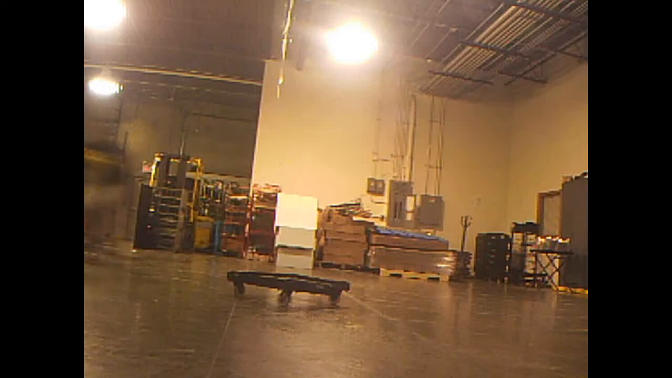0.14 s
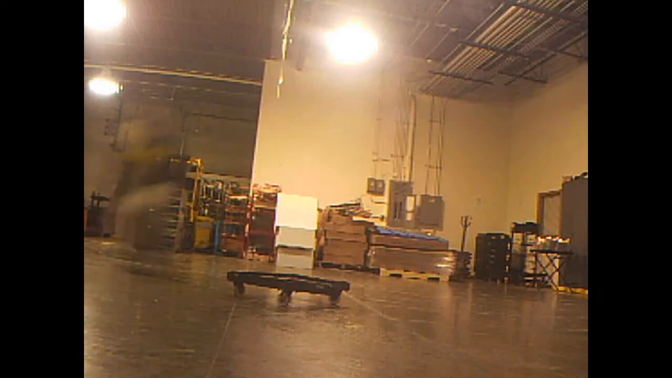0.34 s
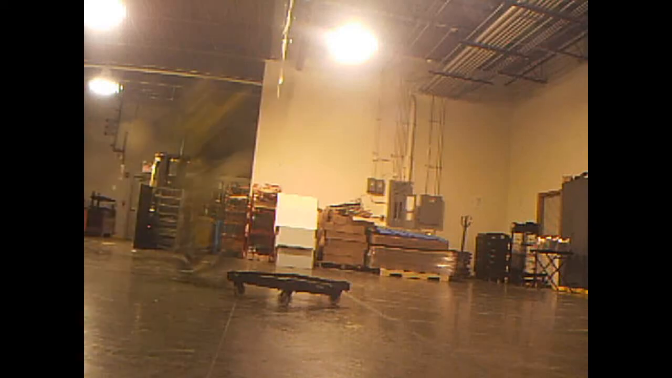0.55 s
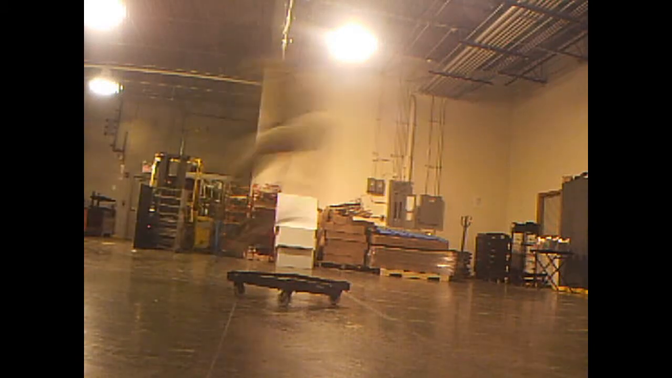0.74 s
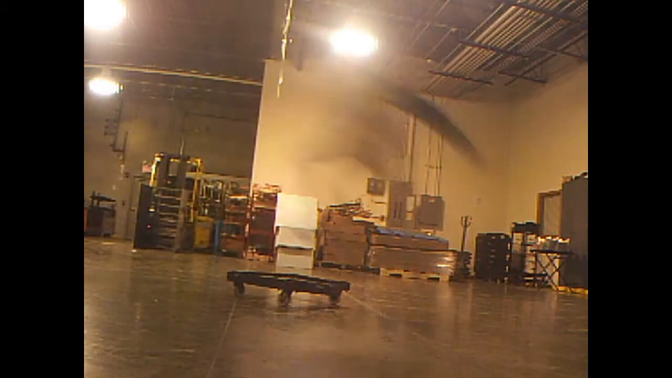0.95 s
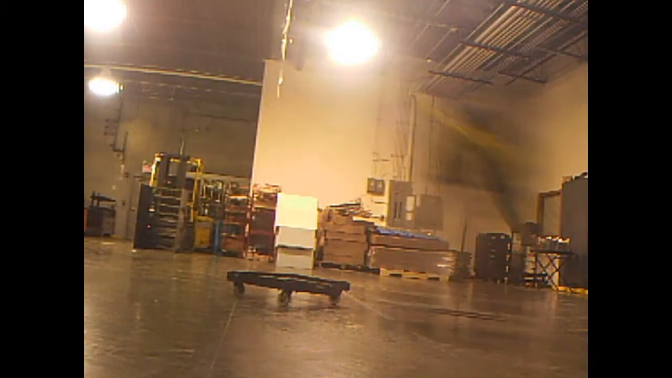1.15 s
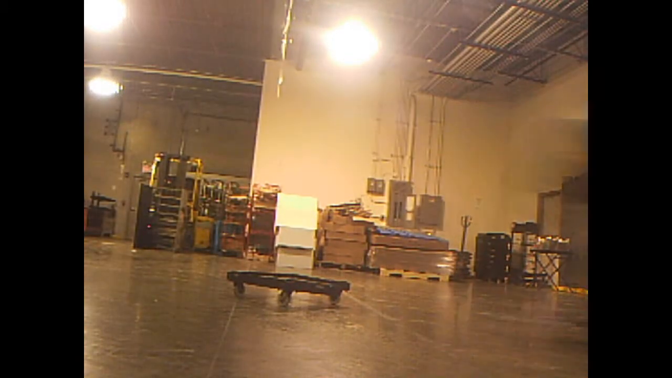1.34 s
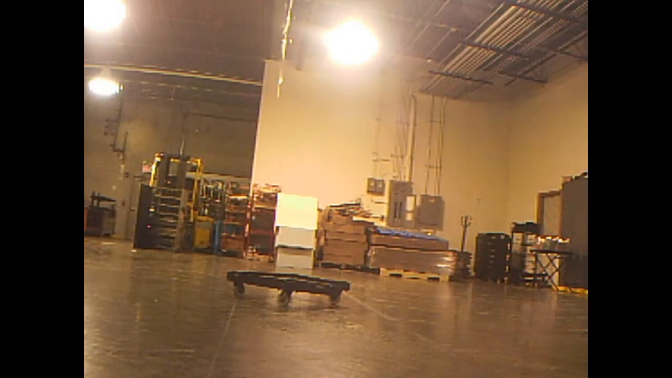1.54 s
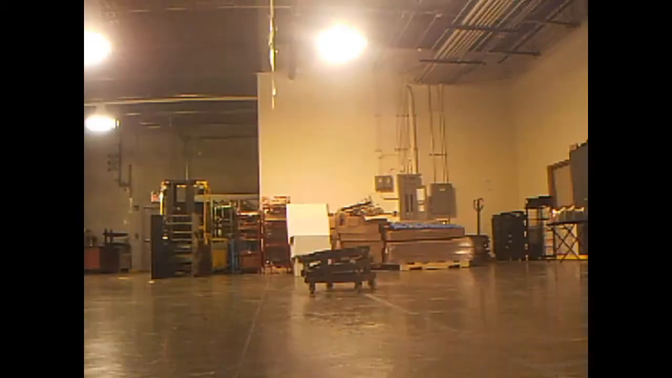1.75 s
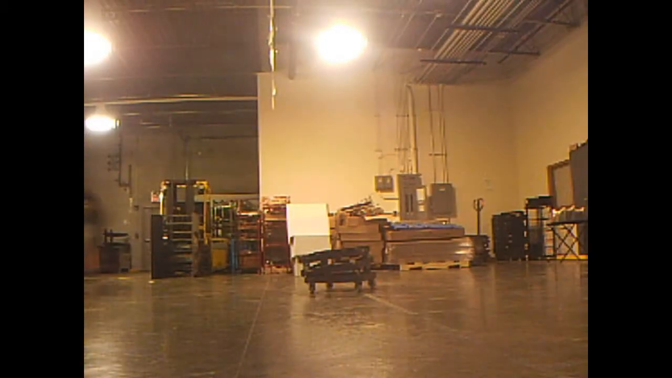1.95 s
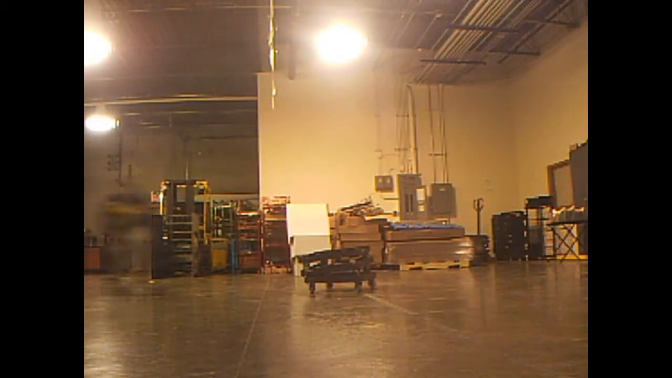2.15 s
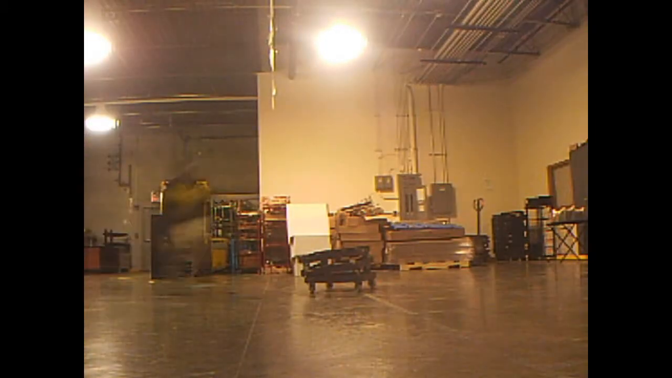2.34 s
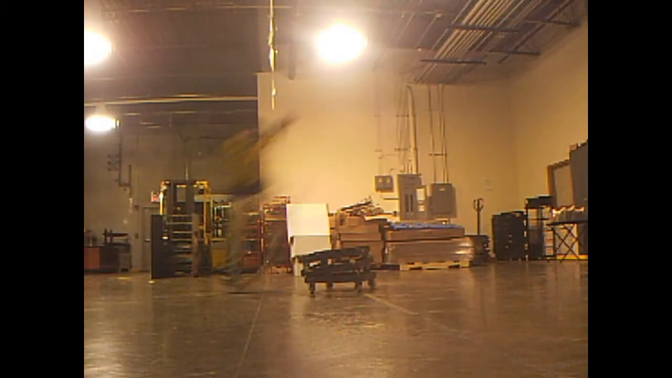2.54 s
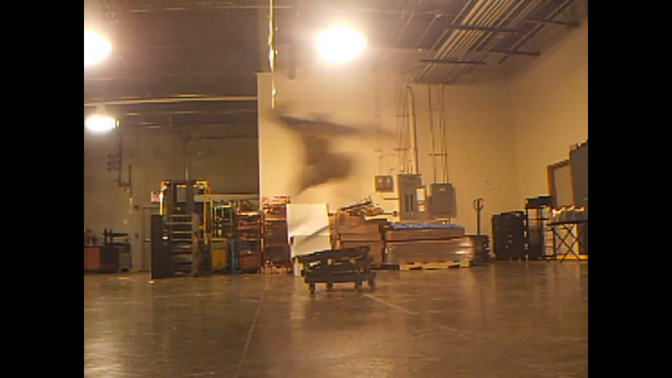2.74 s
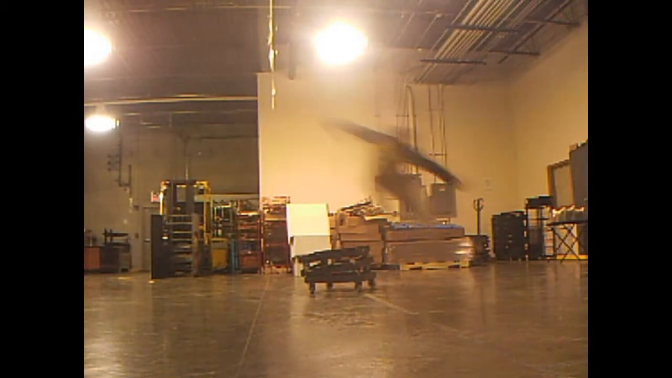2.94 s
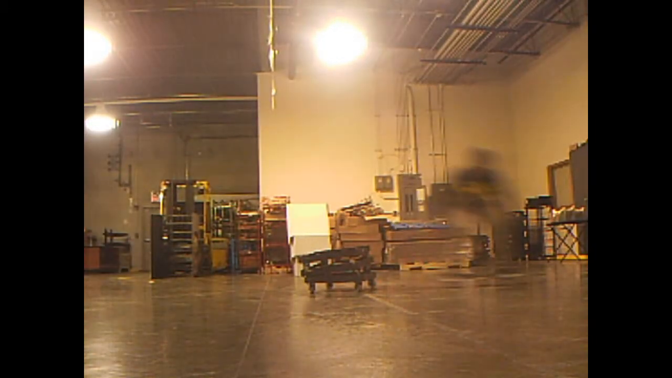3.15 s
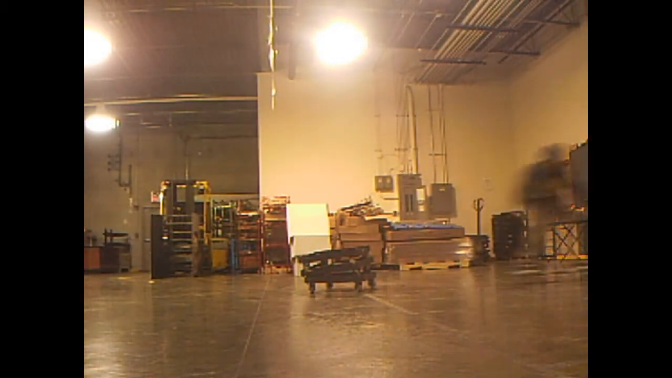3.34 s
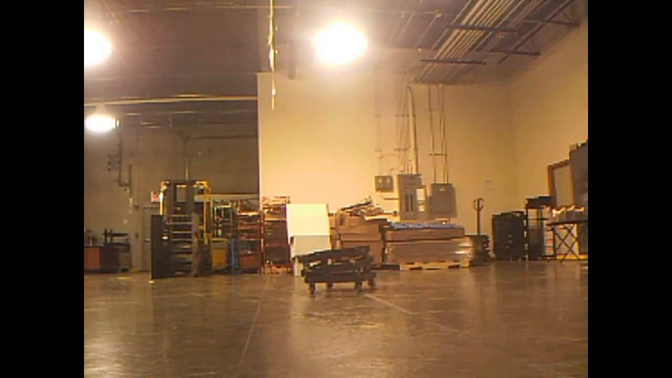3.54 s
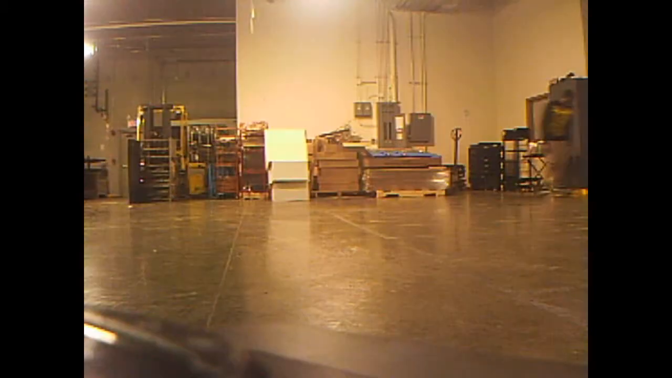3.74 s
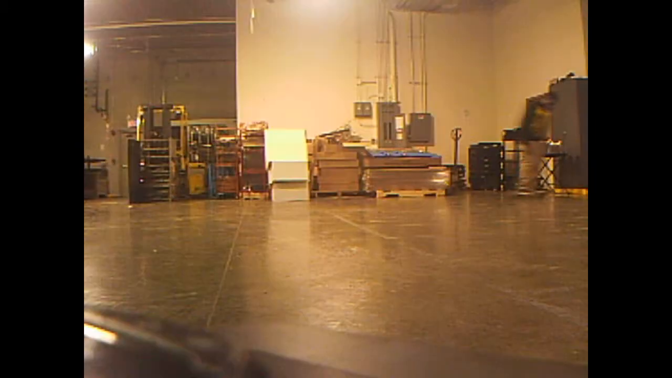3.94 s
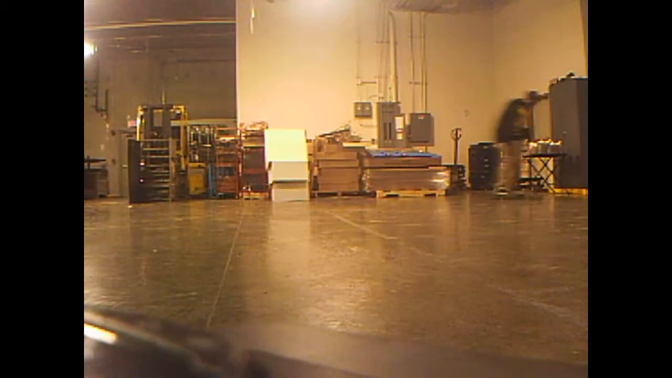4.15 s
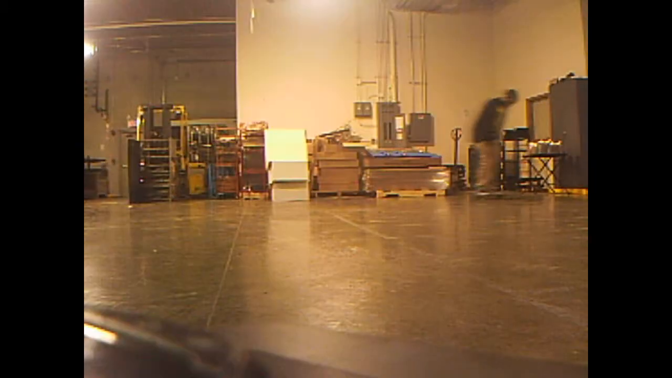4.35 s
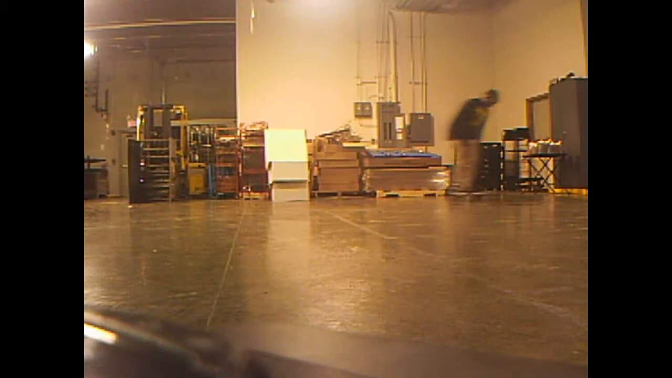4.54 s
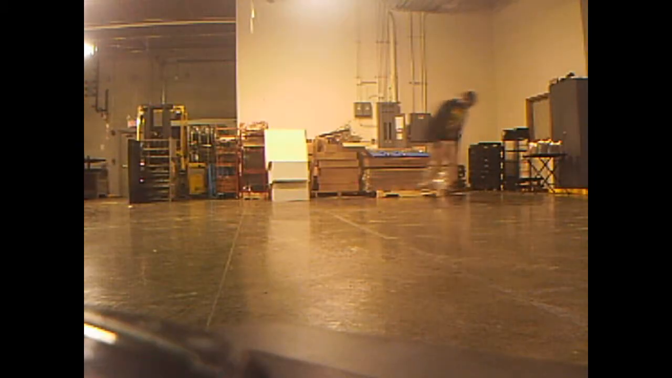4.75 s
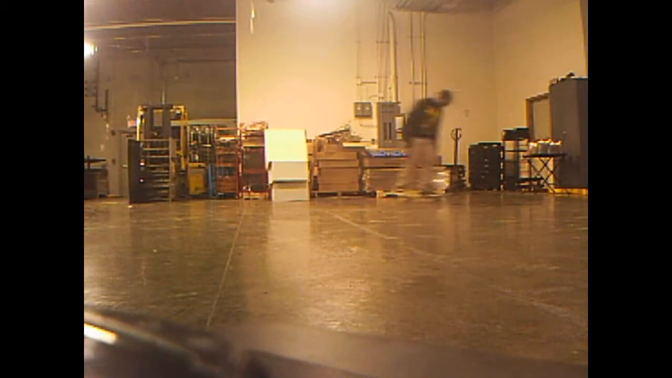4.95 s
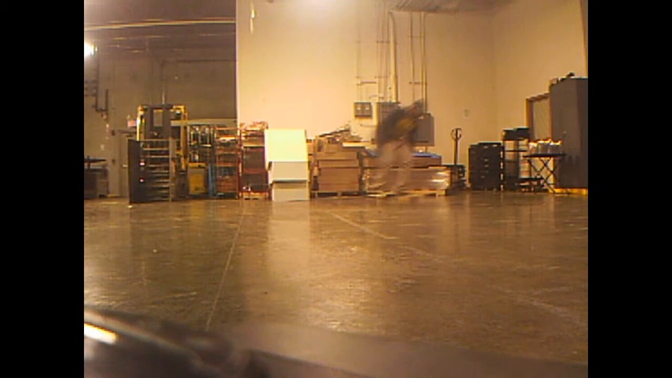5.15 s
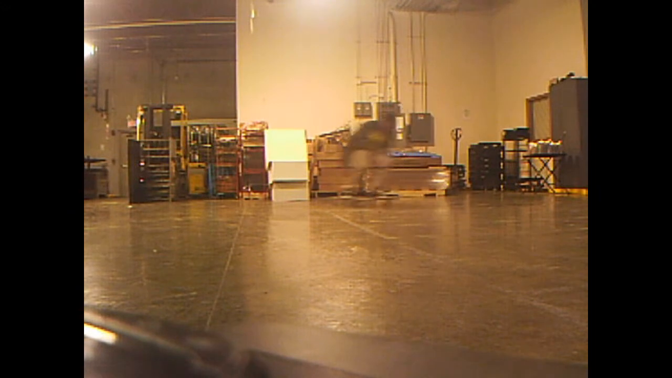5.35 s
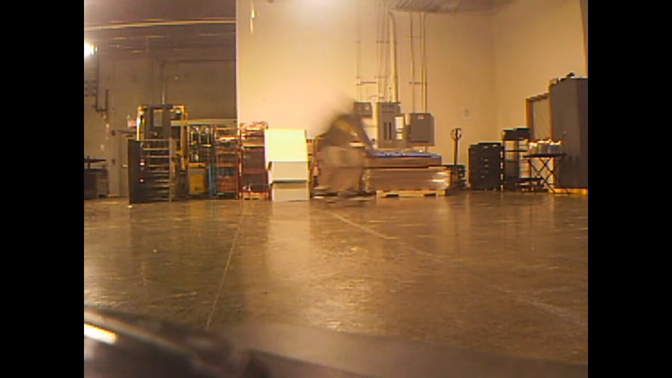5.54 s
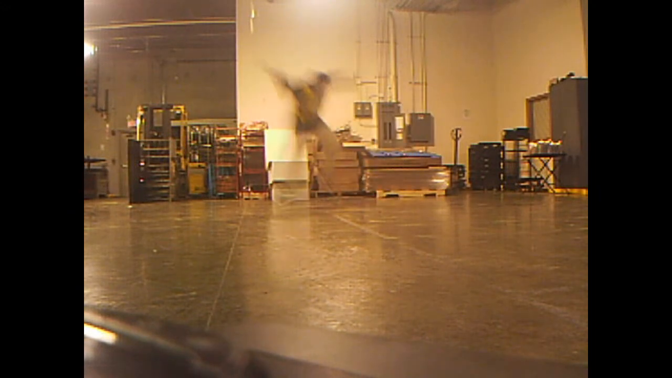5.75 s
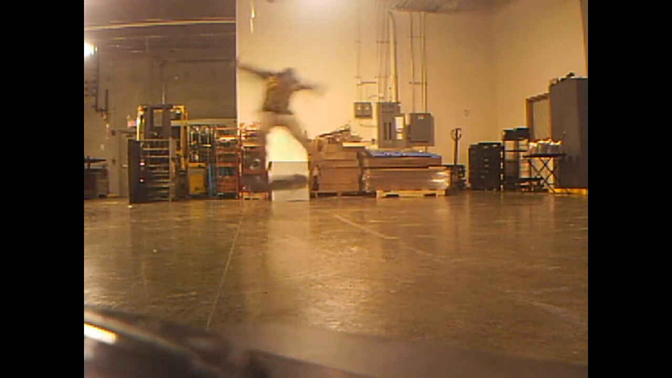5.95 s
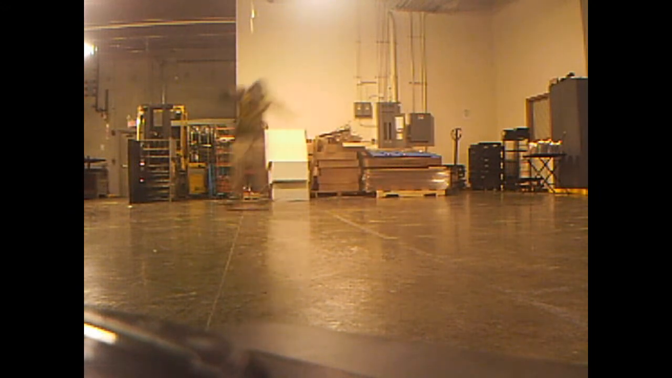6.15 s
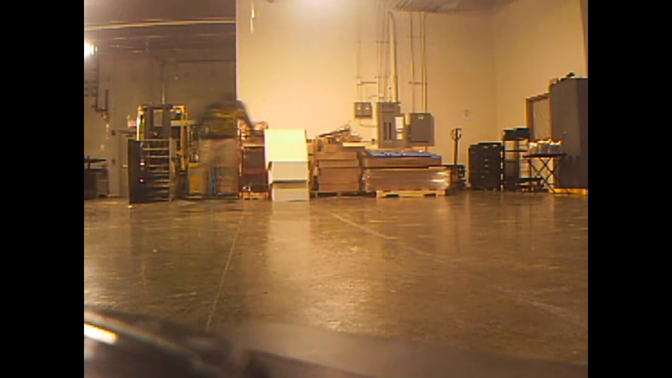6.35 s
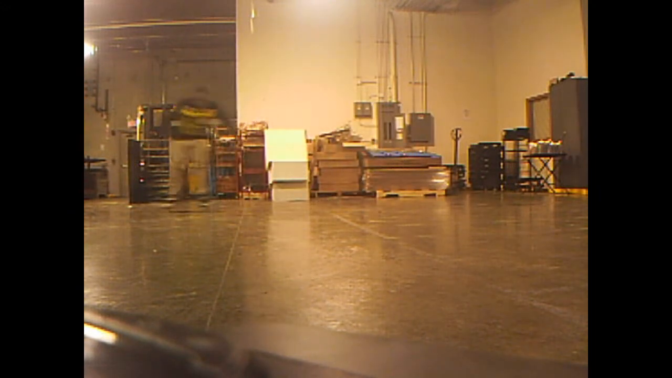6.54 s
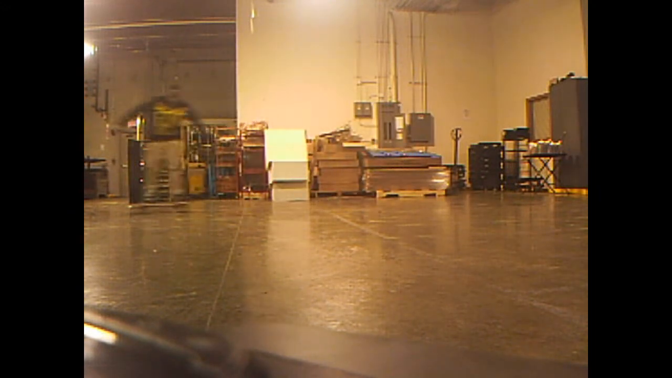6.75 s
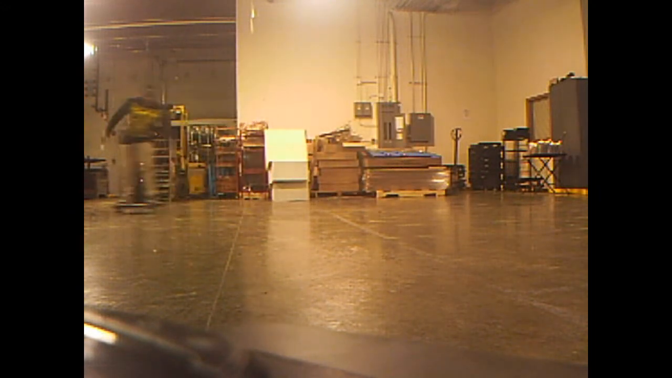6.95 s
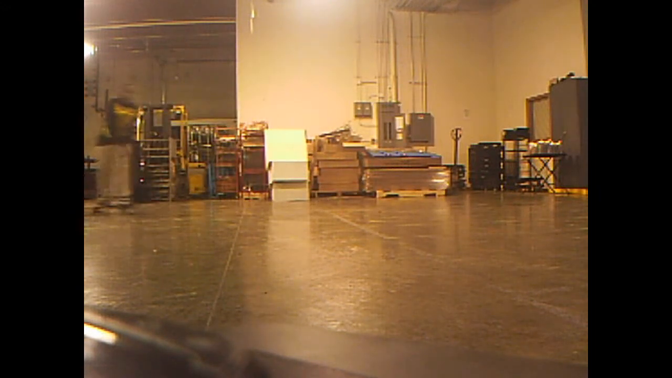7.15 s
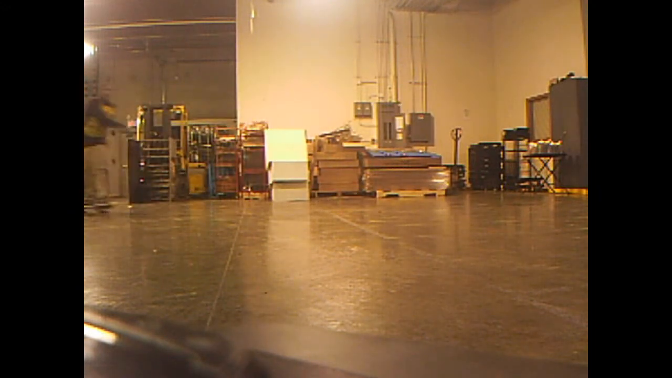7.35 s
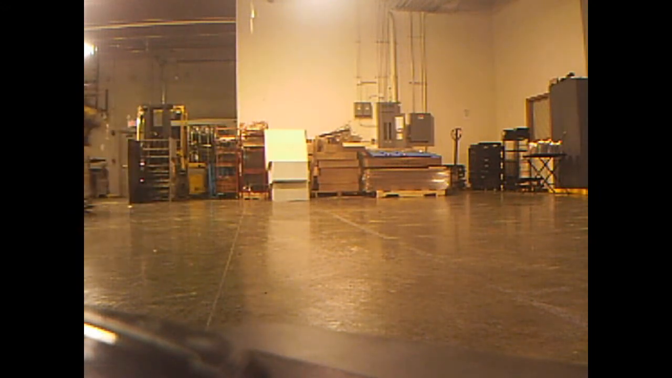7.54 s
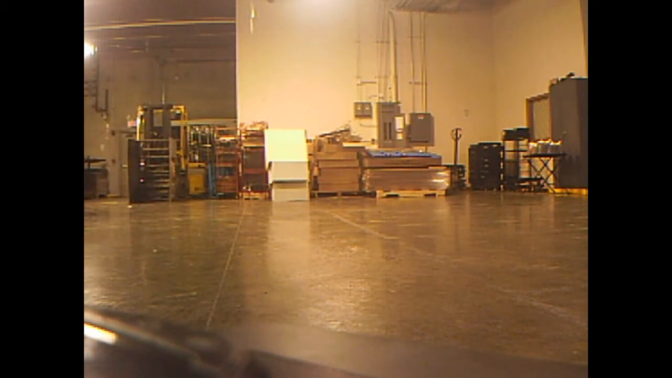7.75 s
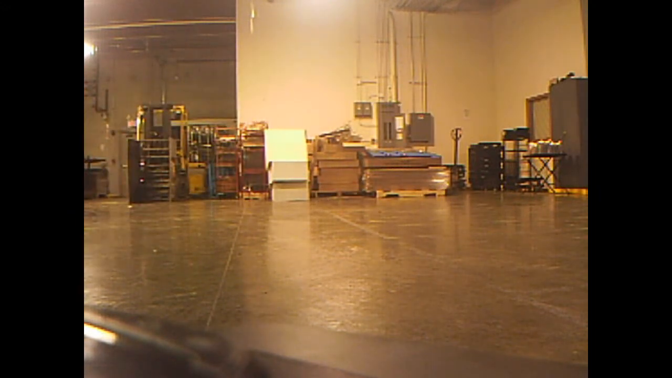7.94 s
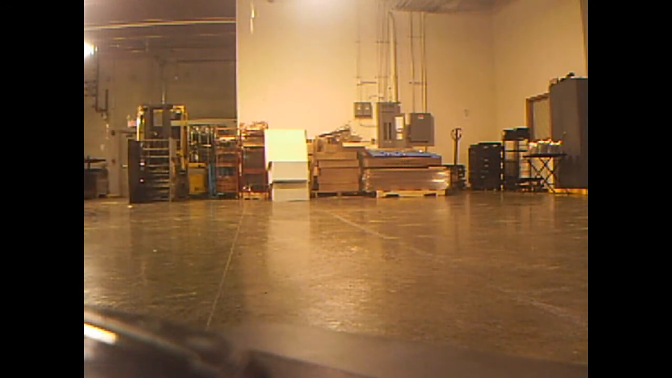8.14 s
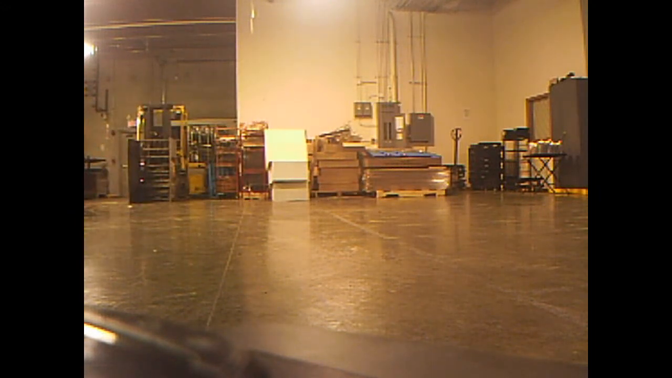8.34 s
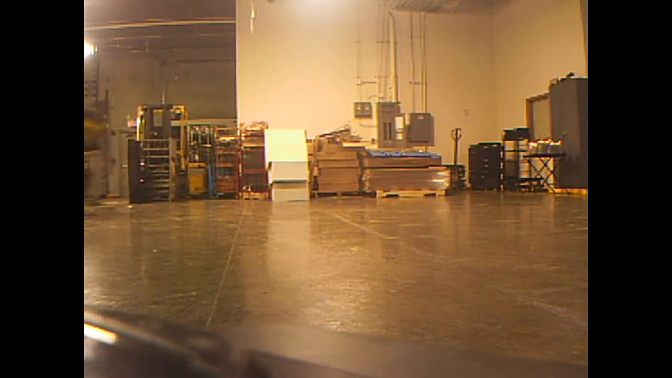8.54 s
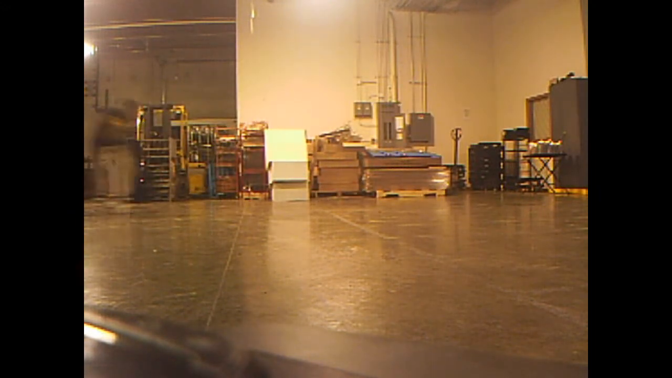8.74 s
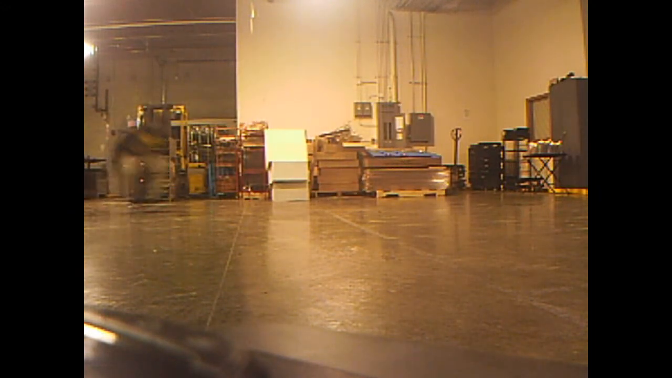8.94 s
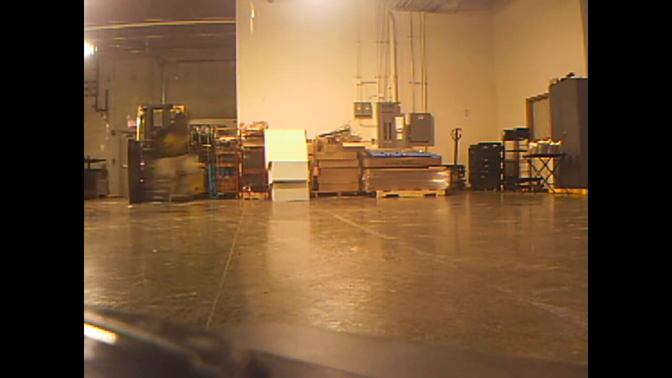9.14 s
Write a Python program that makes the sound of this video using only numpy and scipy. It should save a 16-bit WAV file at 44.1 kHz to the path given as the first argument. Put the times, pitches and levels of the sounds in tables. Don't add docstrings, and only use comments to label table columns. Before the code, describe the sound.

Over a steady ventilation wash and electrical buzz, a skateboard rolls in, pops and lands hard; an abrupt cut, then another pop and slam; another cut, a longer distant roll with soft shoe scuffs, a third pop and landing, and rolling away. The final view is quiet, distant wheels. The hall is very reverberant; a small camera microphone crackles on the impacts and ducks afterward.

```python
import sys
import numpy as np
from scipy import signal
from scipy.fft import rfft
from scipy.io import wavfile
from scipy.ndimage import uniform_filter1d

SR = 44100
rng = np.random.default_rng(int(sys.argv[2]) if len(sys.argv) > 2 else 0)


def natural_amplitude(level_db):
    exponent = np.asarray(level_db, float) / 20
    return 10 ** exponent


def dump_mix(stems):
    frames = np.atleast_2d(stems).T
    limited = np.clip(frames, -1, 1)
    pcm = np.round(limited * 32767).astype(np.int16)
    wavfile.write(sys.argv[1], SR, pcm)


N = 405279

VIEW_STARTS = [.0635, 1.856, 3.817, 7.95]
# freq_hz, level_db (per Hz)
LIGHT_COLOUR = [(59, -61.5), (100, -29.5), (391, -6), (461, -1), (1200, -12), (1330, -5.5), (3990, -16.5),
                (13000, -44)]
# freq_hz, level_db (per Hz)
HEAVY_COLOUR = [(35, -68.5), (60, -44.5), (207, -16.5), (259, -22), (310, -12.5), (416, -10.5), (544, -2.5),
                (609, -6.5), (798, -2), (1570, -14), (3600, -24), (13000, -60.5)]
# pitch_hz, level_db, t60_s (time to fade by 60 dB)
DECK_TONES = [(71, -8.5, 0.1), (165, -5.5, 0.068), (560, 1.5, .2), (707, -1, 0.22), (892, -4, .16),
              (1111, -5.5, 0.15), (1400, -14, 0.026), (1847, -9.5, 0.11)]
# pitch_hz, width_hz, level_db (not used)
FREE_DECK_TONES = [(483, 22, 0), (688, 74, 0), (1263, 130, -2), (1645, 67, -1), (1903, 58, -1),
                   (2280, 73, -3), (2770, 91, -7), (3780, 67, -12)]
# freq_hz, t60_s
HALL_FADE = [(100, 0.53), (250, 2.07), (600, 2.06), (1200, 2.82), (2500, 2.45), (5000, 1.55), (10000, 0.88)]
# freq_hz, level_db (per Hz)
WHEEL_COLOUR = [(59, -50), (100, -18), (125, -13), (200, -31.5), (408, -6.5), (565, 1), (959, -13.5),
                (1110, -8), (1280, -18), (1700, -14.5), (2880, -29), (8650, -43.5), (13000, -51)]
# freq_hz, level_db (per Hz)
AIR_COLOUR = [(12, -31.5), (20, -10), (32, -22), (119, -14), (179, -16), (551, -10), (615, -3), (725, -5),
              (855, -6.5), (928, -10), (1120, -12.5), (1950, -21.5), (3460, -31.5), (8790, -51),
              (14000, -61)]
# freq_hz, level_db (rms)
BUZZ_COLOUR = [(120, -55.5), (240, -75.5), (360, -58.5), (1000, -56.5), (2200, -72.5), (5000, -90.5),
               (9000, -97.5)]
# start_s, peak_db, pitch_hz, t60_s
POPS = [(.642, 2, 2020, 0.046), (.659, -3, 2970, 0.016), (.665, -3.5, 2390, 0.037),
        (.690, -2.5, 4100, 0.018), (2.552, -2, 1928, 0.085), (2.566, -4, 2815, 0.059),
        (2.573, -5, 2617, 0.074), (2.615, -12, 1730, .05), (2.832, -21, 6000, 0.0098),
        (5.791, -11.5, 4460, 0.16), (5.808, -4.5, 7050, 0.12), (5.832, -11, 1624, 0.11),
        (5.849, -7, 2190, 0.09), (6.057, -24.5, 6840, .01)]
# start_s, peak_db, pitch_hz, t60_s
LANDINGS = [(1.0165, -2.5, 1400, 0.073), (1.022, 9.5, 720, .065), (1.045, 8, 550, 0.074),
            (1.062, 6.5, 905, 0.21), (1.08, 2.5, 720, 0.068), (1.098, 7.5, 550, 0.085),
            (1.116, 0, 560, 0.28), (2.969, 9.5, 942, 0.097), (2.986, 9, 778, 0.13), (3.015, 9.5, 778, 0.16),
            (3.036, 7, 530, .08), (3.06, 4.5, 940, .07), (3.085, 6.5, 778, 0.027), (6.116, -1, 613, 0.037),
            (6.134, -7, 592, 0.1), (6.141, 2.5, 570, .12), (6.153, 6, 800, 0.12), (6.172, 4, 1067, 0.14),
            (6.19, 2.5, 899.6, 0.089), (6.250, 6.5, 800, .025)]
# start_s, peak_db, pitch_hz
KNOCKS = [(.393, -27, 614), (2.081, -27, 597), (4.045, -29, 466), (7.277, -19.5, 910)]
# start_s, end_s, start_level_db, end_level_db, brightness_db (per octave)
RUNS = [(.07, 0.628, -30, -29, 0.23), (1.15, 1.85, -40, -35, 2.2), (1.87, 2.545, -28, -28, -0.27),
        (3.1, 3.81, -38.5, -45, -0.4), (3.83, 4.498, -31.5, -38.5, -1), (4.5, 5.635, -36.5, -44, 1.1),
        (5.64, 5.783, -45, -36, 2), (6.3, 6.8, -27, -48, 1.3), (6.8, 7.898, -37.5, -44, 1.5),
        (7.96, 8.616, -37.5, -42, 1), (8.62, 9.165, -40, -39, -1)]
# start_s, level_db, length_s
SCUFFS = [(4.532, -49.5, 0.28), (4.822, -58, 0.16), (5.645, -62, 0.2), (7.981, -57, .2), (8.447, -58, 0.16),
          (8.798, -58.5, 0.23)]
HALL_LEVELS = {"pop": [0.5, 2.64, 4.5], "landing": [2.5, 1.28, 4], "knock": [-3.5, -5, 5.5]}
WEIGHT_SHARES = {"pop": [.12, 0.095, .04], "landing": [.92, .88, 0.7], "knock": [1, .98, 1]}
VIEW_GAINS = [4.9, .2, 0, 0]
# first_s, steps (count), apart_s, step_db
GAIN_DROPS = [
    (.2, 2, .25, -2.1),
    (1.05, 4, .026, -2.5),
    (2.52, 1, 0, -2.3),
    (3.02, 4, .027, -2.35),
    (6.17, 3, .043, -2.),
]
# first_s, steps (count)
GAIN_CLIMBS = [(1.6, 1), (2.03, 2), (3.55, 1), (6.78, 5)]


def evened(x):
    return x / np.sqrt(np.mean(x ** 2) + 1e-20)


def read(points, hz):
    f, value = np.transpose(points)
    return np.interp(np.log(hz + 1), np.log(f + 1), value)


def view_end(s):
    return min(edge for edge in VIEW_STARTS + [N / SR] if edge > s)


def add(mix, s, sound):
    part = mix[round(s * SR):round(view_end(s) * SR)][:len(sound)]
    part += sound[:len(part)]


def hiss(count, level_db, patchy_db=0., size=512):
    frames = count * 4 // size + 5
    hz = np.fft.rfftfreq(size, 1 / SR)[:, None]
    t = np.arange(frames) * size / 4 / SR
    a, b, patches = rng.standard_normal((frames, size // 2 + 1, 3)).T
    patches = uniform_filter1d(patches, size=6, axis=0)
    patches = evened(uniform_filter1d(patches, size=16, axis=1))
    z = (a + 1j * b) * natural_amplitude(level_db(hz, t) + patchy_db * patches)
    return signal.istft(z, nperseg=size, noverlap=size * 3 // 4)[1][:count]


def lamp_buzz():
    buzz_hz = 119.95
    order = np.arange(1, 76)
    uneven_db = 7.2 * rng.standard_normal(len(order)) * (order > 1)
    size = natural_amplitude(read(BUZZ_COLOUR, order * buzz_hz) + uneven_db)
    cycle = np.linspace(0, 1, 1025)
    turns = order * cycle[:, None] + rng.random(len(order))
    wave = (np.sqrt(2) * size * np.sin(2 * np.pi * turns)).sum(1)
    return np.interp(np.arange(N) * buzz_hz / SR % 1, cycle, wave)


def air():
    colour = lambda hz, t: read(AIR_COLOUR, hz) + 0 * t
    wash = evened(hiss(N, colour, patchy_db=1.5, size=2048))
    return natural_amplitude(-37.5) * wash + lamp_buzz()


def roll(start, end, db_in, db_out, tilt_db):
    t = np.arange(start, end + .02, 1 / SR)
    colour = lambda hz, u: read(WHEEL_COLOUR, hz) + tilt_db * np.log2(hz / 700 + .2) + 0 * u
    flutter = evened(uniform_filter1d(rng.standard_normal(len(t)), size=500))
    level = natural_amplitude(np.interp(t, [start, end], [db_in, db_out]) + 1.2 * flutter)
    level = level * signal.windows.tukey(len(t), 400 / len(t))
    return max(start - .01, VIEW_STARTS[0]), level * evened(hiss(len(t), colour, patchy_db=0.7))


def causal(level_db):
    log = np.log(natural_amplitude(np.maximum(level_db, -100)))
    whole = np.r_[log, log[-2:0:-1]]
    return np.fft.ifft(np.exp(whole - 1j * signal.hilbert(whole).imag)).real[:len(log)]


def hall(colour_db, rise, count):
    fading = lambda hz, t: colour_db[:, None] - 60 * t / read(HALL_FADE, hz)
    tail = hiss(count, fading, patchy_db=1.3, size=2048)
    t = np.arange(len(tail)) / SR
    walls = 1. * (rng.random(len(t)) < 8. / SR)
    slaps = signal.oaconvolve(walls, np.hanning(400), "same")
    build_up = 1 - np.exp(-np.maximum(t - .006, 0) / rise)
    tail = tail * build_up * (1 + .5 * slaps + .8 * np.exp(-t / 0.054))
    return tail / np.linalg.norm(tail)


def direct_blow(db, hz, t60, weight, colour_db, deck):
    count = len(deck)
    t = np.arange(count) / SR
    rattle = rng.standard_normal(count) * natural_amplitude(-60 * t / t60) * np.minimum(t / 0.00048, 1)
    spot = natural_amplitude(-60 * t / t60 / .8) * np.sin(2 * np.pi * hz * t) * np.minimum(t / 0.0011, 1)
    spot = signal.fftconvolve(spot, rattle * natural_amplitude(-60 * t / .006))[:count]
    sound = evened(signal.fftconvolve(rattle, causal(colour_db))[:count])
    sound = sound + .4 * weight * evened(signal.fftconvolve(rattle, deck)[:count])
    sound = sound + .85 * evened(spot) / (1 + (hz / 3800) ** 4)
    return natural_amplitude(db) * sound / abs(sound).max()


def hall_colour(hz, weight, colour_db, deck, bins):
    ringing = abs(rfft(deck[:2048] * np.hanning(4096)[2048:]))
    ringing = evened(ringing) + 1.1 * evened(1 / (22. ** 2 + (bins - hz) ** 2))
    heard = evened(natural_amplitude(colour_db)) + 0.89 * weight ** 2 * evened(ringing)
    free = sum(1 / (1 + (2 * (bins - f) / width) ** 2) for f, width, _ in FREE_DECK_TONES)
    return 20 * np.log10(heard * (1 + 0.85 * (1 - weight) * free))


def hit(s, db, hz, t60, weight, hall_db):
    t = np.arange(SR // 4) / SR
    bins = np.fft.rfftfreq(2048, 1 / SR)
    colour_db = weight * read(HEAVY_COLOUR, bins) + (1 - weight) * read(LIGHT_COLOUR, bins)
    colour_db = colour_db + 1.5 * np.log2(bins / 700 + 0.034)
    deck = sum(natural_amplitude(-60 * t / ring + d) * np.sin(2 * np.pi * f * t) for f, d, ring in DECK_TONES)
    sound = direct_blow(db, hz, t60, weight, colour_db, deck)
    heard_db = hall_colour(hz, weight, colour_db, deck, bins)
    half_seconds = min(np.ceil(2 * (view_end(s) - s)), 2 + 2 * round(weight))
    tail = hall(heard_db, 0.005 + 0.11 * t60, int(half_seconds) * SR // 2)
    tail = tail * natural_amplitude(hall_db) * np.linalg.norm(sound)
    return s, tail + np.pad(sound, (0, len(tail) - len(t)))


def scuff(s, db, length):
    centre_hz, width_octaves, rise = 3640, 0.49, 0.22
    u = np.arange(0, 3 * length, 1 / SR) / length / rise
    band = lambda hz, t: -6 * (np.log2(hz / centre_hz + .01) / width_octaves) ** 2 + 0 * t
    swell = u / (1 + u ** 2) * 2 * np.hanning(2 * len(u))[len(u):]
    return s, natural_amplitude(db) * swell * evened(hiss(len(u), band, patchy_db=1.4))


def scene():
    mix = air()
    for row in RUNS:
        add(mix, *roll(*row))
    for row in SCUFFS:
        add(mix, *scuff(*row))
    knocks = [tuple(row) + (0.043,) for row in KNOCKS]
    for kind, rows in [("pop", POPS), ("landing", LANDINGS), ("knock", knocks)]:
        for row in rows:
            view = np.searchsorted(VIEW_STARTS, row[0]) - 1
            add(mix, *hit(*row, WEIGHT_SHARES[kind][view], HALL_LEVELS[kind][view]))
    return mix[None]


def preamp(t):
    climb_db, climb_s = 1.4, .245
    view = np.maximum(np.searchsorted(VIEW_STARTS, t, "right") - 1, 0)
    db = np.take(VIEW_GAINS, view)
    climbs = [(s, steps, climb_s, climb_db) for s, steps in GAIN_CLIMBS]
    for s, steps, apart, step_db in GAIN_DROPS + climbs:
        same_view = view == np.searchsorted(VIEW_STARTS, s) - 1
        steps_done = np.searchsorted(s + apart * np.arange(steps), t, "right")
        db = db + same_view * step_db * steps_done
    return uniform_filter1d(natural_amplitude(db), size=400)


def converter(sound, gain):
    rest_offset, unit_offset, full_scale = -.0096, .0095, 1
    offset = rest_offset + gain * (unit_offset - rest_offset)
    half = signal.resample_poly(sound * gain + offset, 1, 2)
    half = half + natural_amplitude(-66.5) * rng.standard_normal(len(half))
    half = (half + full_scale) % (2 * full_scale) - full_scale
    full = np.interp(np.arange(N) / 2, np.arange(len(half)), half)
    return signal.sosfilt(signal.butter(4, 10300, fs=SR, output="sos"), full)


def roll_off(x):
    return signal.sosfilt(signal.butter(12, 15710, fs=SR, output="sos"), x)


def record(dry):
    t = np.arange(N) / SR
    full = converter(dry[0], preamp(t))
    gap = np.min([abs(t - edge) for edge in VIEW_STARTS], axis=0)
    full = full * np.clip(gap / 0.0048, 0, 1) * (t > VIEW_STARTS[0])
    return roll_off(np.clip(full, -1, 1)[None])


dry = scene()
out = record(dry)
dump_mix(out)
```